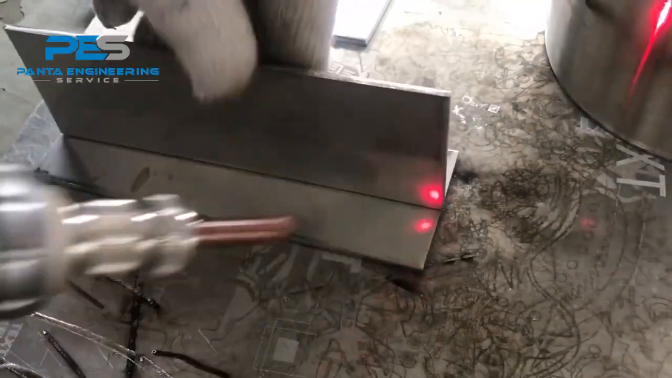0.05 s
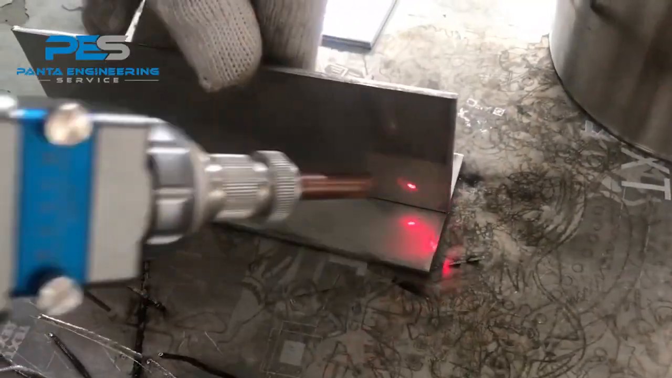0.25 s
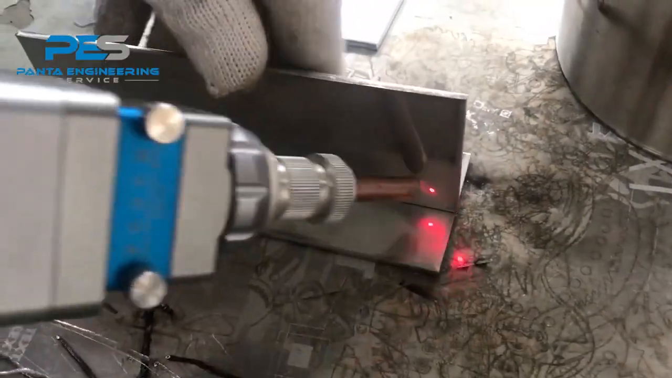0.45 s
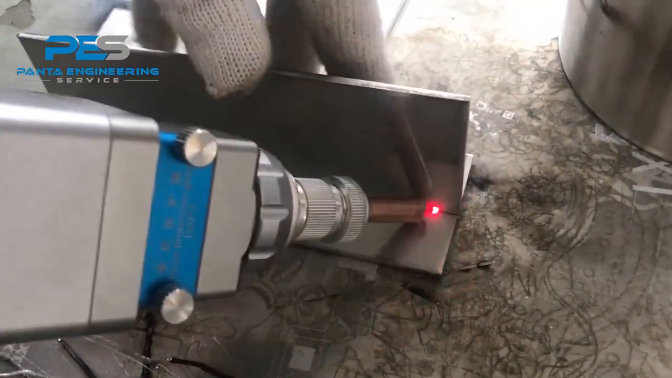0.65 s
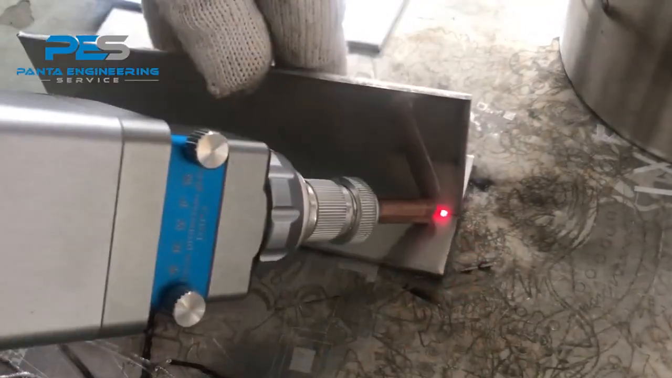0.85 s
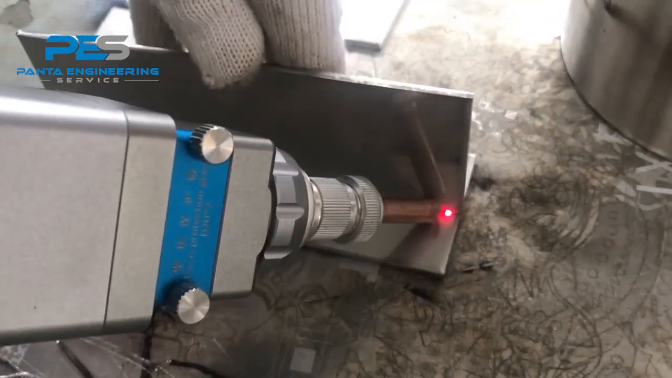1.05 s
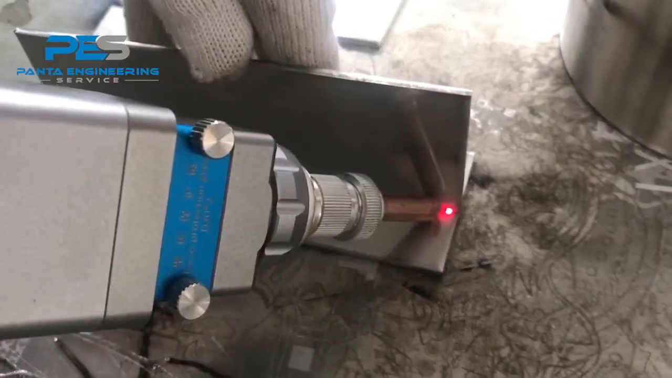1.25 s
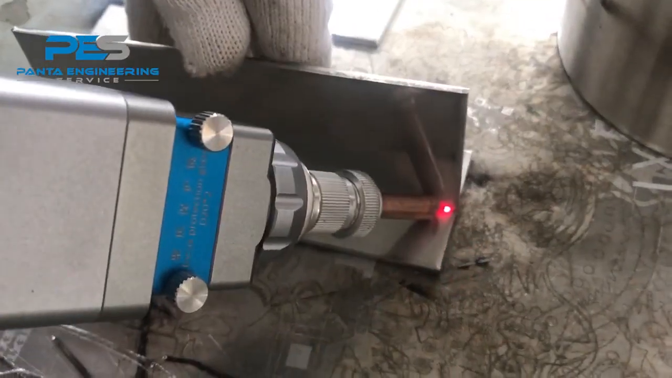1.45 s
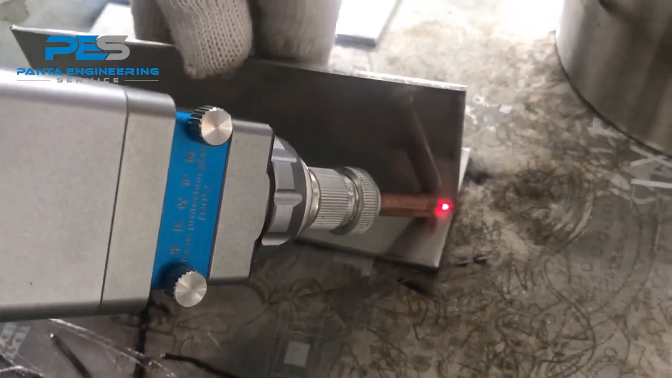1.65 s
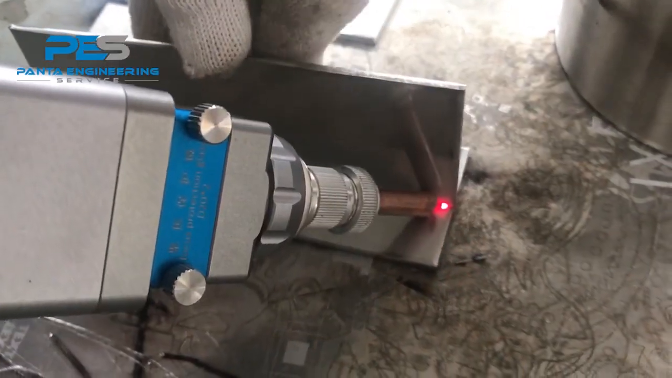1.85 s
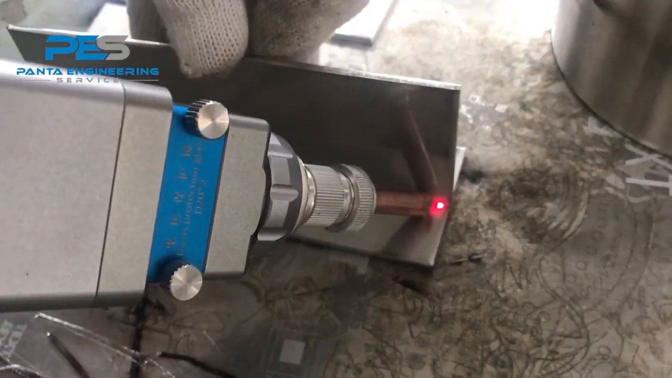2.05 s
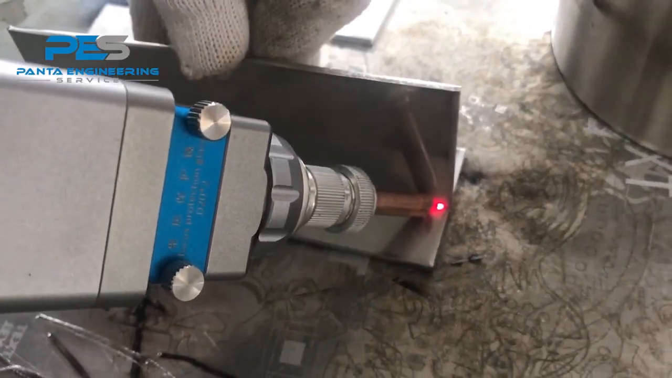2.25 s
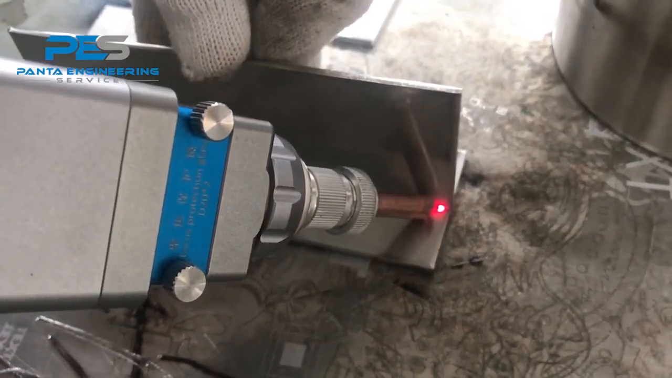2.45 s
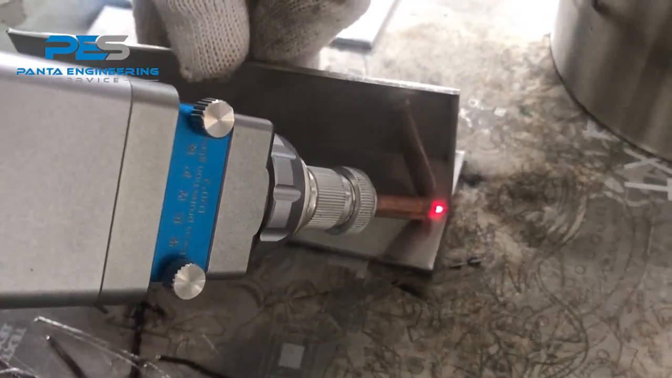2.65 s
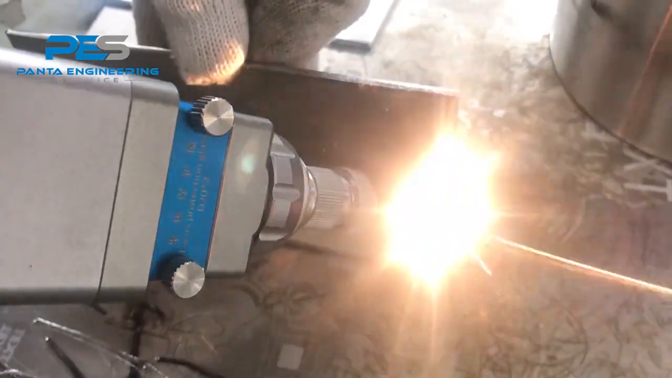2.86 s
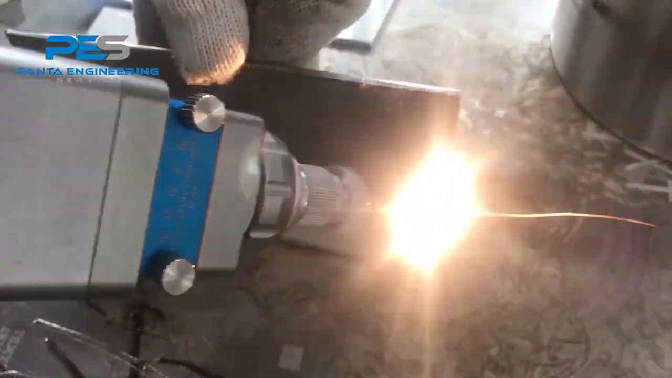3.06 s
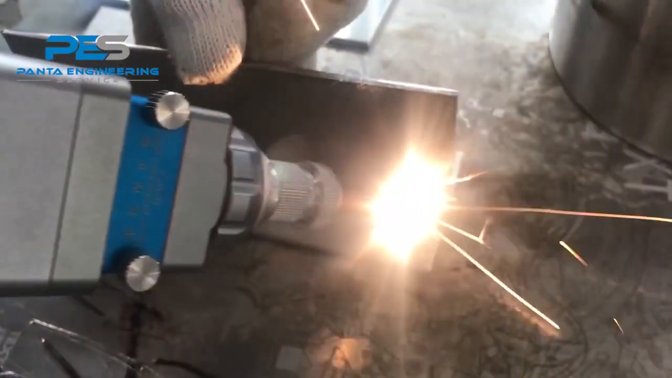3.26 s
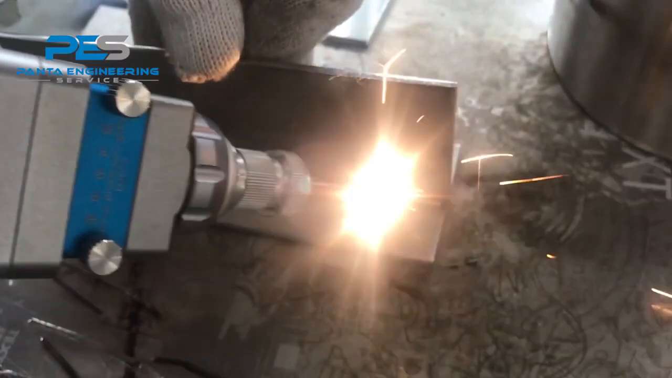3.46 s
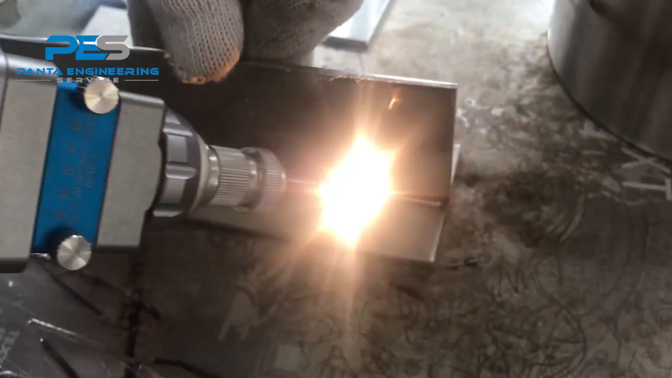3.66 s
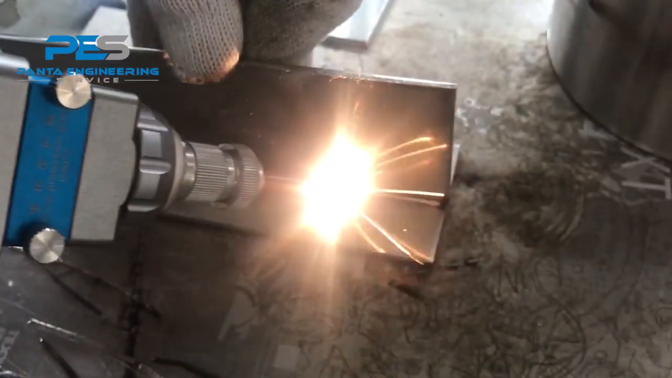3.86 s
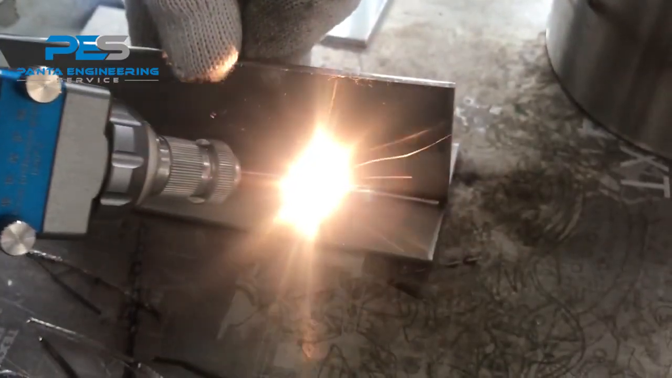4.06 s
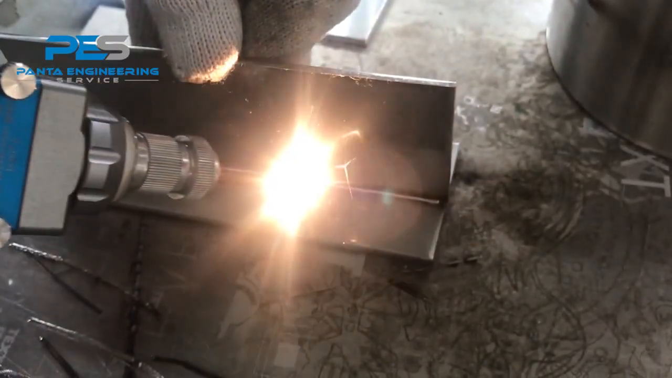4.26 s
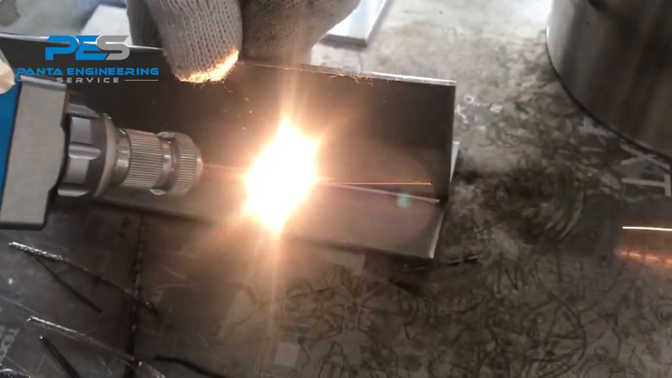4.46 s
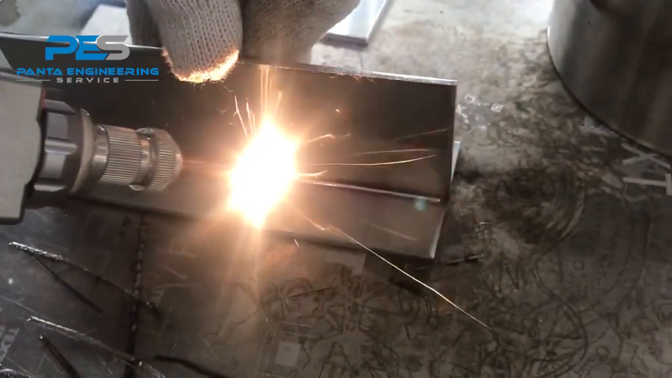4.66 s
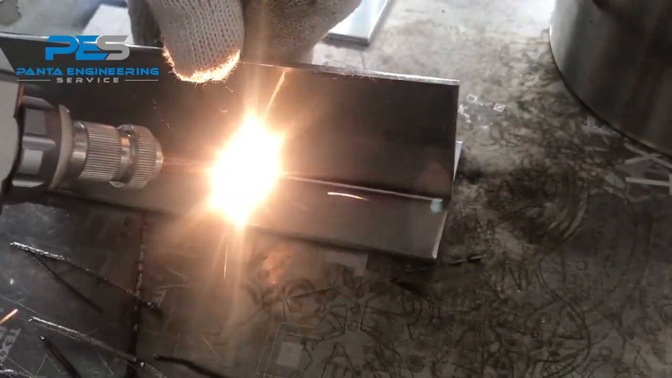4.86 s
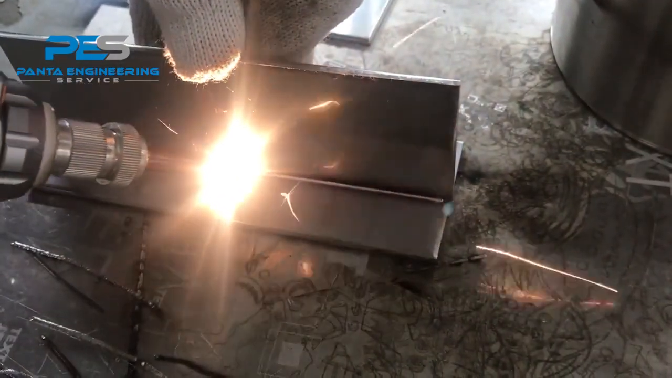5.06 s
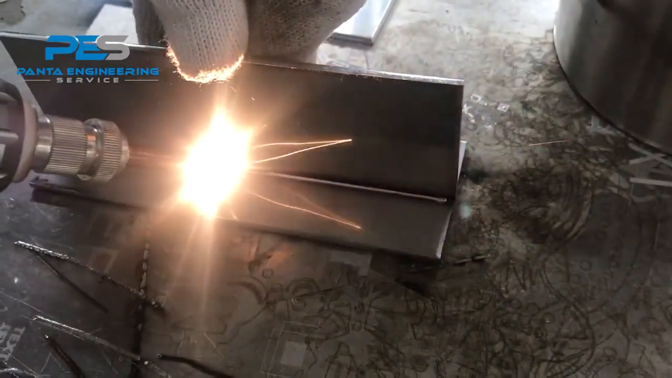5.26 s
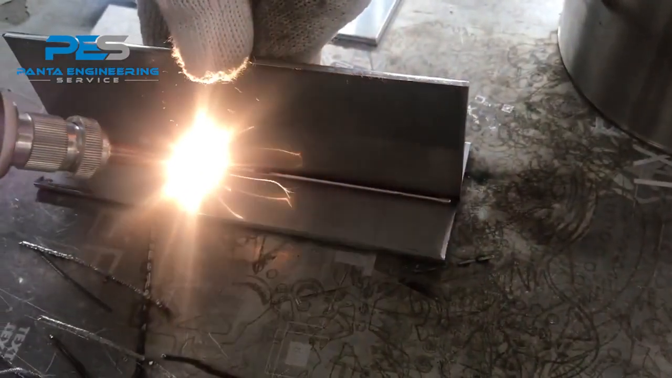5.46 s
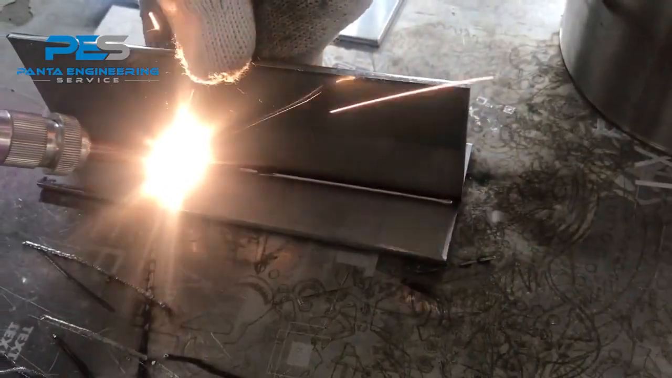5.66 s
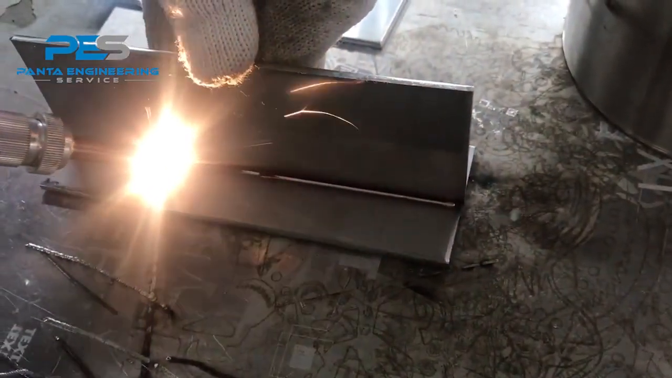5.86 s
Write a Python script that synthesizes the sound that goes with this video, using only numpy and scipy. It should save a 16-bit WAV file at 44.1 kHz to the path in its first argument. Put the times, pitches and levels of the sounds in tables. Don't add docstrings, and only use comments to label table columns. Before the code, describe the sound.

A handheld laser welder nozzle clinks on sheet steel, a valve snaps, gas hisses, and a loud throbbing, shrieking weld roars until the end.

```python
import sys
import numpy as np
from scipy import signal
from scipy.fft import rfft, irfft
from scipy.io import wavfile
from scipy.ndimage import uniform_filter1d

SR = 44100
rng = np.random.default_rng(int(sys.argv[2]) if len(sys.argv) > 2 else 0)


def level_to_linear(level):
    exponent = np.asarray(level, float) / 20
    return 10 ** exponent


def int16_out(signal):
    q = np.round(np.clip(np.atleast_2d(signal).T, -1, 1) * 32767)
    wavfile.write(sys.argv[1], SR, q.astype(np.int16))


N = 261072
T = np.arange(N) / SR
HZ = np.arange(N // 2 + 1) * SR / N + 1e-3
LOG_HZ = np.log(HZ)
VALVE_S, IGNITE_S = 2.6485, 2.912
SWING_HZ, SWING_TOP_S = 91.27, 4.6647


def curve(rows):
    times, levels = np.transpose(rows)
    return np.interp(T, times, levels)


def walk(rate_hz):
    hold = int(SR / rate_hz)
    steps = np.repeat(rng.standard_normal(N // hold + 1), hold)
    return 1.115 * uniform_filter1d(steps, hold)[:N]


def bump(s, width_s):
    return np.exp(-((T - s) / width_s) ** 2)


def die_away(t, t60_s):
    return np.exp(-np.log(1000) * t / t60_s)


def resonances(rows, skirt):
    return sum(level_to_linear(2 * db) / (1 + (2 * (HZ - hz) / width_hz) ** 2) ** skirt for hz, width_hz, db in rows)


def bands(source, power, edges_hz):
    spectrum = rfft(source) * np.sqrt(power)
    spectrum *= N / np.sqrt(2 * np.sum(np.abs(spectrum) ** 2))
    place = np.interp(LOG_HZ, np.log(edges_hz), np.arange(len(edges_hz)))
    for k, hz in enumerate(edges_hz):
        share = np.maximum(1 - np.abs(place - k), 0)
        yield hz, irfft(spectrum * share, N)


def ring(modes):
    t = T[:4096]
    y = sum(level_to_linear(db) * np.sin(2 * np.pi * hz * t) * die_away(t, t60_s) for hz, db, t60_s in modes)
    return y / np.max(np.abs(y))


def add(out, s, x):
    i = int(s * SR)
    out[i:i + len(x)] += x[:N - i]


def tone(hz, db, drift, flutter_db):
    level = np.sqrt(2) * level_to_linear(db + flutter_db * walk(25.0))
    unsteady_hz = hz * (1 + drift * walk(40))
    return level * np.sin(2 * np.pi * np.cumsum(unsteady_hz) / SR)


# f/Hz, level/dB (per Hz)
SHOP_COLOUR = [(15, -40), (28, -1), (48, -2), (200, -7.5), (607, -14), (1070, -27.5), (1440, -24),
               (2600, -25.5), (5000, -31), (6210, -31), (9570, -31), (10400, -32), (12500, -31.5),
               (15700, -30)]
# f/Hz, width/Hz, level/dB
SHOP_HUMPS = [(53.5, 6.9, 5), (96.7, 9.2, 8.5), (198, 6.4, 5), (2160, 620, 3), (8743, 2000, 2),
              (11500, 790, 6.5), (10900, 120, 9), (1180, 950, 2.5)]
# f/Hz, level/dB
WHINES = [(48.4, -56), (199.2, -53), (909.8, -58), (1211, -61), (8172, -60), (8549, -71), (10067, -60),
          (11402, -71.5), (13867, -72), (14250, -64.5), (14820, -72)]
# f/Hz, resting level/dB, top t/s, swell/dB, half length/s
SWELLS = [
    (5705, -78, 1.2, 24, .45),
    (5703, -78, 2.15, 20, 1.1),
    (11018, -56.5, 1.4, 5, 1.1),
    (13870, -72, .35, 10, .2),
    (2853, -74, 1.8, 14, 1.3),
]
# t/s, level/dB
GAIN = [
    (0, -2.5),
    (.25, 0),
    (2.6, -0.5),
    (2.9, -1.5),
    (3.05, -10.5),
    (3.45, -13),
    (3.92, -18),
    (4.05, -10.5),
    (5.92, -15),
]


def workshop():
    hz_points, db_points = np.transpose(SHOP_COLOUR)
    colour = level_to_linear(2 * np.interp(LOG_HZ, np.log(hz_points), db_points))
    power = colour * (1 + resonances(SHOP_HUMPS, skirt=4.8))
    until_valve = np.minimum(T, VALVE_S)
    weld_hiss_db = 13.5 * np.clip((T - VALVE_S) / 2.4, 0, 1)
    hiss_db = -2 + 0.66 * until_valve + weld_hiss_db
    noise, swell = 0, walk(1.74)
    for hz, x in bands(rng.standard_normal(N), power, 40 * 2. ** np.arange(9)):
        wander_db = .4 * swell + (1.3 if hz < 1000 else .7) * walk(8)
        noise = noise + x * level_to_linear(wander_db + hiss_db * (hz > 1000))
    whine = sum(tone(hz, db, drift=0.00202, flutter_db=2.0) for hz, db in WHINES)
    for hz, db, s, swell_db, width_s in SWELLS:
        whine = whine + tone(hz, db + swell_db * bump(s, width_s), drift=0.00158, flutter_db=2.1)
    noise_db = -34 - 0.36 * until_valve
    return (noise * level_to_linear(noise_db) + whine) * level_to_linear(curve(GAIN))


# t/s, peak level/dB, brightness/dB, contact/ms
TAPS = [(.003, -25, -18, 4), (.017, -28, -16, 11), (.061, -29, -22, 12), (.084, -28.5, -18, 3.5),
        (.2248, -20, -6, 2.35), (.2315, -31, -4, 4.0), (.250, -31, -8, 5.8), (.7772, -10, -24, 2.2),
        (.7812, -7, -1, 1.26), (0.789, -25, -21, 7.5), (.803, -42, -15, 5.9), (.8290, -23.5, -22, 1.8)]
# f/Hz, level/dB, t60/s
SHEET = [(635, -12, 0.028), (788, -1, 0.025), (1155, 0, 0.029), (1390, 1, 0.015), (1690, -3.5, .02),
         (2133, -2, 0.037), (2300, -5, 0.015), (2930, -0.5, 0.011), (3860, -4, 0.011), (4320, -10, 0.018),
         (5050, -5, 0.01), (6100, -5, 0.012), (6500, -22, 0.0057), (8400, -18, .006), (9270, -22, 0.0051),
         (11500, -19, 0.0054), (13700, -19, 0.0056)]


def taps():
    out = np.zeros(N)
    no_bass = signal.butter(6, 530, "high", fs=SR, output="sos")
    buzz_band = signal.butter(1, [2500, 11000], "band", fs=SR, output="sos")
    for s, db, bright_db, contact_ms in TAPS:
        modes = []
        for hz, mode_db, t60_s in SHEET:
            touched_hz = hz * (1 + 0.016 * rng.standard_normal())
            modes.append((touched_hz, mode_db + bright_db * np.log2(hz / 1000) / 2, t60_s))
        u = T[:1024] * 1000 / contact_ms
        scrape = rng.standard_normal(1024) * u * np.exp(-2 * u)
        y = signal.sosfilt(no_bass, signal.fftconvolve(ring(modes), scrape))
        add(out, s, level_to_linear(db) * y / np.max(np.abs(y)))
        buzz = signal.sosfilt(buzz_band, rng.standard_normal(2049))[1:] * die_away(T[:2048], 0.069)
        add(out, s, level_to_linear(db + bright_db - 15) * buzz)
    return out


# t/s, peak level/dB, f/Hz, t60/s
TINK = (.003, -35, 6150, .06)


def tink():
    out = np.zeros(N)
    s, db, hz, t60_s = TINK
    add(out, s, level_to_linear(db) * ring([(hz, 0, t60_s)]))
    return out


# f/Hz, width/Hz, level/dB
GAS_CORNER = [(1680, 400, -20), (2430, 300, -5.5), (2800, 160, -4), (3220, 430, -2), (3630, 1070, -1.5),
              (4230, 330, -3), (7650, 610, -6), (8350, 450, -8.5), (9000, 500, -9), (10060, 880, -4.5),
              (10800, 500, -4), (11200, 670, 1), (12059, 640, -6), (13100, 820, -7), (14400, 900, -15),
              (15300, 900, -9)]


def gas():
    hiss, gust = 0, walk(60)
    for hz, x in bands(rng.standard_normal(N), resonances(GAS_CORNER, skirt=2.52), 1500 * 2 ** np.arange(0, 3.6, .7)):
        hiss = hiss + x * level_to_linear(1.0 * gust + 0.62 * walk(24.85))
    dip_db = -6 * bump(VALVE_S + .011, .012)
    flow_db = -19 - 4 * (T - VALVE_S) + dip_db
    flow = level_to_linear(flow_db + 0.61 * curve(GAIN))
    leak = level_to_linear(-35) * np.clip((T - 2.633) / 0.0022, 0, 1)
    return hiss * np.where(T > VALVE_S, flow, leak)


# f/Hz, level/dB, t60/s
VALVE_SNAP = [(2550, -8, .007), (3400, 0, .0045), (4250, -7, .007), (10500, -22, .004), (14000, -28, .004)]
# f/Hz, level/dB, t60/s
VALVE_BODY = [(484, 0.5, 0.027), (627, -12, .025), (950, -6, .0082), (1210, -9, 0.0072)]


def valve():
    out = np.zeros(N)
    rise = 1 - np.exp(-(T[:4096] / .0002) ** 2)
    add(out, VALVE_S, level_to_linear(1.5) * rise * ring(VALVE_SNAP))
    add(out, VALVE_S + 0.00046, level_to_linear(-6.5) * rise * ring(VALVE_BODY))
    return out


# f/Hz, width/Hz, level/dB
FLARE_CORNER = [(1350, 1800, -17.5), (3230, 570, -2.5), (4160, 760, -1), (5180, 490, -2), (7180, 710, -1.5),
                (8000, 550, -4.5), (9900, 700, -12), (11200, 1000, -5), (13100, 900, -11),
                (15200, 1200, -1)]


def flare():
    roar, burst = 0, walk(110)
    for hz, x in bands(rng.standard_normal(N), resonances(FLARE_CORNER, skirt=1.54), [1500, 3500, 7000, 14000]):
        roar = roar + x * level_to_linear(0.66 * burst + 0.64 * walk(40))
    age = T - IGNITE_S
    rise_s, hold_s = 0.022, 0.066
    sag_db = 45 * np.maximum(age - rise_s - hold_s, 0)
    fall_db = 190 * np.maximum(T - 3.19, 0)
    return roar * level_to_linear(-17 - sag_db - fall_db) * np.sqrt(np.clip(age / rise_s, 0, 1))


# f/Hz, width/Hz, level/dB
PLUME_CORNER = [(677, 870, -26.5), (1334, 500, -14.5), (1830, 470, -15), (2190, 340, -8), (2400, 240, -2.5),
                (2906, 590, -4.5), (3430, 430, -6), (4196, 480, -3), (4970, 610, -3.5), (5430, 390, -0.5),
                (6255, 330, -0.5), (6700, 400, -7), (7095, 520, -2), (8300, 1700, -6.5), (9310, 370, -4),
                (9900, 550, -5.5), (11100, 600, -16), (10850, 450, -8), (12150, 1330, -2.5),
                (13500, 640, -2), (13900, 600, -7.5), (14700, 630, -0.5), (14950, 670, 0.5),
                (15900, 500, 0)]
# f/Hz, depth/dB
THROB = [(1000, 4.5), (2700, 2.5), (4000, 2.5), (5600, 7), (7100, 7.5), (8500, 2.5), (14000, 2)]
# settled level/dB, extra level at lighting/dB, flutter/dB
CHOP = [(-44, 10, 1.5), (-37.5, -3, 1), (-28, -2.5, .5)]
# t/s, level/dB
WHISTLE = [
    (2.93, 5),
    (3.05, 0),
    (3.15, -11),
    (3.3, -1),
    (4.05, 1),
    (4.25, -5.5),
    (4.55, -2.5),
    (4.8, .5),
    (5.92, 0),
]


def plume():
    swing = 2 * np.pi * SWING_HZ * (T - SWING_TOP_S)
    age = np.maximum(T - IGNITE_S, 0)
    grit = rng.standard_normal(N) * level_to_linear(2.0 * rng.exponential(size=N))
    throb_hz, throb_db = np.transpose(THROB)
    low_db, high_db = -2 + 1 * age, 3 - 0.8 * age
    roar, burst = 0, walk(90)
    for hz, x in bands(grit, resonances(PLUME_CORNER, skirt=1.67), 1000 * 2 ** np.arange(0, 4.1, .5)):
        part_db = low_db if hz < 4500 else high_db * np.clip((hz - 7500) / 5000, 0, 1)
        depth_db = np.interp(np.log(hz), np.log(throb_hz), throb_db)
        roar = roar + x * level_to_linear(part_db + depth_db * np.cos(swing) + 0.55 * burst + 0.28 * walk(20))
    sound = roar * level_to_linear(-23.5 - .5 * age)
    sway = .11 * np.cos(swing + .35) + .07 * np.cos(2 * swing + .7)
    beat_db = -1.3 * np.cos(swing + .4) + 1.1 * np.cos(2 * swing + .8)
    chop_hz = 3999.7
    phase = 2 * np.pi * chop_hz * T + sway + .04 * walk(12)
    settling = np.exp(-age / 0.75)
    for k, (db, extra_db, flutter_db) in enumerate(CHOP, 1):
        level_db = db + extra_db * settling + flutter_db * walk(11)
        if k == 3:
            level_db = level_db + curve(WHISTLE)
        sound = sound + np.sqrt(2) * level_to_linear(level_db + beat_db) * np.sin(k * phase)
    return sound * np.clip((T - IGNITE_S) / .008, 0, 1)


# t/s, peak level/dB, slowness (1 is usual)
POPS = [(3.1834, -33, 0.86), (3.1957, -26, 0.54), (3.2066, -28, .46), (3.2938, -25.5, 0.51),
        (3.3391, -32.5, 1.3), (3.7342, -32.5, 1.14), (3.8752, -30.5, 0.71), (4.1274, -27.5, 0.63),
        (4.2707, -30.5, 0.85), (4.3353, -27.5, 0.93), (4.39, -28.5, 1.1), (4.5328, -29, 1.2),
        (4.5989, -24, 0.56), (4.6424, -25.5, 0.48), (4.6539, -32, 0.8), (4.796, -30.5, 0.73),
        (4.9379, -32, 1.3), (5.0364, -24, 0.6), (5.0904, -26, 0.6), (5.1469, -29.5, 1.45),
        (5.3549, -28.5, 1), (5.4207, -30.5, 1.3), (5.5174, -31.5, 1.3), (5.6076, -25, 0.7),
        (5.6172, -26, 0.49), (5.6289, -29, 0.77), (5.672, -32, 1.3), (5.7493, -27.5, 0.94),
        (5.8352, -30.5, 1.15), (5.882, -27, 0.57)]


def pops():
    out, t = np.zeros(N), T[1:2400]
    first = np.ceil((IGNITE_S - SWING_TOP_S) * SWING_HZ)
    last = (N / SR - SWING_TOP_S) * SWING_HZ - 1
    times = SWING_TOP_S + np.arange(first, last) / SWING_HZ
    jitter, size, pace = rng.random((len(times), 3)).T
    louder_db = np.minimum(-4.5 * np.log(size), 10)
    faint_db = -49 + 2.5 * (times - IGNITE_S) + louder_db
    faint = list(zip(times + 0.0025 * (jitter - .5), faint_db, 0.62 + 0.68 * pace))
    for s, db, slow in faint + list(POPS):
        u = t / np.clip(slow, .4, 2)
        chirp = np.cos(4 * np.log(u / .0015)) * (1 - np.exp(-(u / .00035) ** 2))
        body = np.exp(-u / 0.011) * (0.74 + u / 0.014)
        crack = 1.72 * np.exp(-u / 0.00075)
        add(out, s, level_to_linear(db - 1.0) * chirp * (body + crack))
    return out


# t/s, peak level/dB
SPARKS = [
    (4.4, -32),
    (4.1, -25),
    (5.6180, -31),
    (3.5, -19),
]


def sparks():
    out = np.zeros(N)
    for s, db in SPARKS:
        add(out, s, level_to_linear(db) * ring([(1000, 0, .005), (1700, -1, .005), (2200, -1, .008)]))
    return out


def room_echo(near):
    t = T[:SR // 2]
    tail = rng.standard_normal(SR // 2) * die_away(t, 0.26) * (t > .004)
    return signal.fftconvolve(near, tail / np.sqrt(np.sum(tail ** 2)))[:N]


def scene():
    machines = workshop()
    near = taps() + tink() + gas() + valve() + flare() + plume() + pops() + sparks()
    return (near + level_to_linear(-17) * room_echo(near) + machines)[None]


def roll_off(x):
    return signal.sosfilt(signal.butter(12, 16900, fs=SR, output="sos"), x)


def record(dry):
    x = signal.sosfilt(signal.butter(7, 39, "high", fs=SR, output="sos"), dry)
    x = np.tanh(0.94 * x) / 0.87
    x = signal.sosfilt(signal.ellip(14, .3, 70, 15715, fs=SR, output="sos"), x)
    return roll_off(x)


dry = scene()
out = record(dry)
int16_out(out)
```